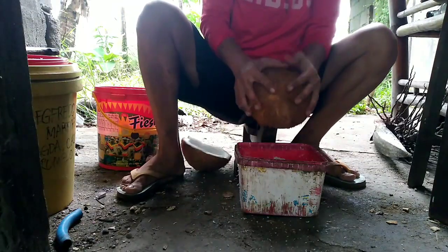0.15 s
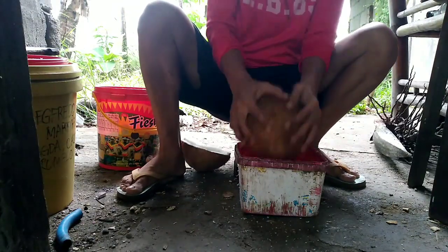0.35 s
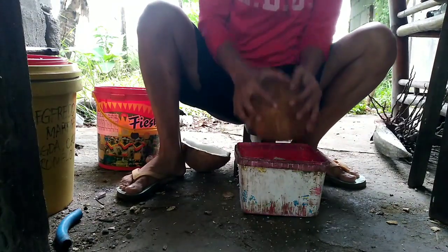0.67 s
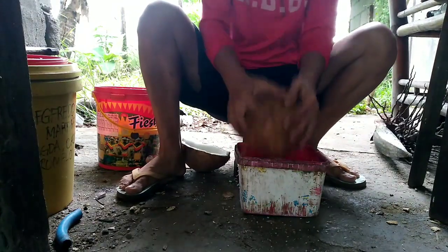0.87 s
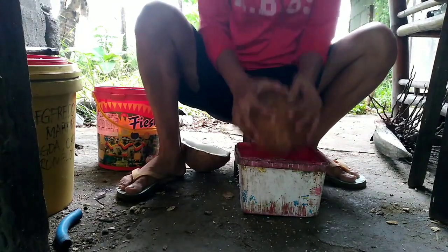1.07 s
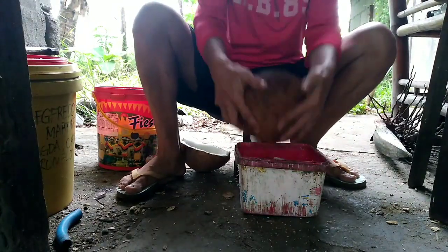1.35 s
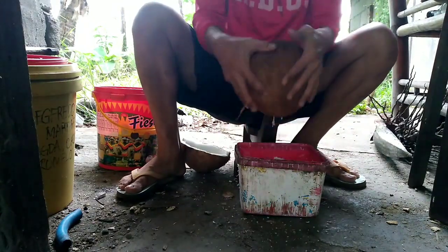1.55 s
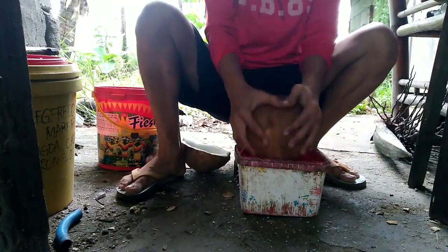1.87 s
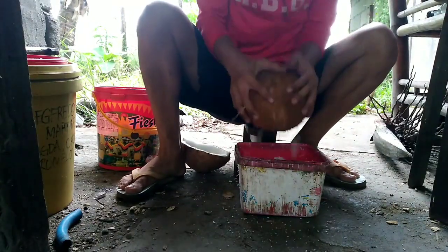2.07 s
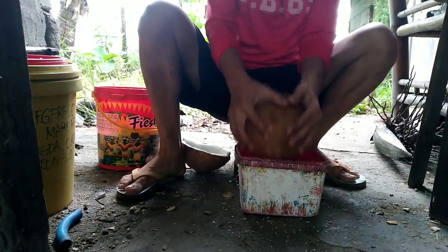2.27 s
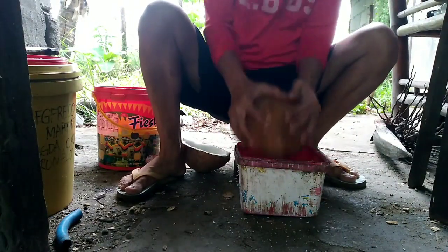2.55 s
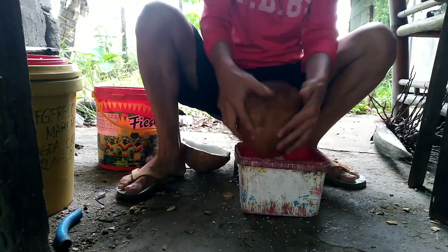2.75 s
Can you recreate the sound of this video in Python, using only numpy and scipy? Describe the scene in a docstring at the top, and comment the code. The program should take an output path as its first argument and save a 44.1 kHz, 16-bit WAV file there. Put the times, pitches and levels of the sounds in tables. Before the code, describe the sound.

Half a coconut is scraped on a toothed metal grater, six crunchy, hollow rasps with small knocks and squeaks between pauses; close stereo microphone under an open shelter, a faint engine humming far off.

```python
"""An engine hums far off under a faint hiss; after a barely audible touch, half a coconut is pulled six times
over the toothed metal blade of a grater, under a roof on a concrete floor. Each pull swells and dies away.
Engine: sine orders; air: coloured noise. Pulls: random fibre snaps and friction noise, juddering, coloured
as rasp and spray and ringing in hollow shell and blade. Set-downs are damped thumps with clink and scuff;
torn clumps are falling chirps, squeaks are short tones. Echoes and a short tail make the shelter."""
import sys
import numpy as np
from scipy import signal
from scipy.fft import rfft, irfft
from scipy.io import wavfile

SR = 44100
rng = np.random.default_rng(int(sys.argv[2]) if len(sys.argv) > 2 else 0)


def put_to_file(sound):
    """Save the sound as 16-bit audio at rate SR, in the file named by the first command-line argument."""
    columns = np.atleast_2d(sound).T  # one column per channel
    safe = np.clip(columns, -1, 1)
    whole_steps = np.round(safe * 32767)
    wavfile.write(sys.argv[1], SR, whole_steps.astype(np.int16))


N = 127890
T = np.arange(N) / SR


def from_db(db):
    """Amplitude ratio."""
    return 10 ** (np.asarray(db) / 20)


def rms_one(x):
    """Scales to rms 1."""
    return x / np.sqrt(np.mean(x ** 2) + 1e-20)


def at_hz(points, hz):
    """Interpolates a table over log frequency."""
    points = np.array(points)
    return np.interp(np.log(hz), np.log(points[:, 0]), points[:, 1])


def drift(rate_hz):
    """Slow chance with spread 1: noise through a two-pole low-pass at SR / 20."""
    r = np.exp(-40 * np.pi * rate_hz / SR)
    noise = rng.standard_normal(N // 20 + 4002)
    slow = signal.lfilter([1], [1, -2 * r, r * r], noise)[4000:]  # drop the settling
    return np.interp(np.arange(N) / 20, np.arange(len(slow)), rms_one(slow))


def blip(age, rise_s):
    """Short rounded burst, peak 1 at rise_s."""
    return (age / rise_s * np.exp(1 - age / rise_s)) ** 2


def widen(pair, alike):
    """Two unrelated signals become left and right with a given likeness."""
    alike = np.clip(alike, -1, 1)
    side = np.array([[1], [-1]])
    return np.sqrt(1 + alike) * pair[0] + np.sqrt(1 - alike) * pair[1] * side


PATCHES_PER_S = 35


def colour(draws, spectrum, likeness, patchy_db):
    """Third-octave bands, neighbours fed by different draws, flickering singly if patchy; stereo, rms 1."""
    out = 0
    edges_hz = 22 * 2 ** (np.arange(30) / 3)
    for k, (low, high) in enumerate(zip(edges_hz, edges_hz[1:])):
        hz = np.sqrt(low * high)
        if hz <= spectrum[0][0] / 2:
            continue
        sos = signal.butter(2, [low, high], "band", fs=SR, output="sos")
        band = signal.sosfilt(sos, draws[k % 2])
        flicker_db = patchy_db * drift(PATCHES_PER_S) if patchy_db else 0
        out = out + from_db(at_hz(spectrum, hz) + flicker_db) * widen(band, at_hz(likeness, hz))
    return rms_one(out)


def shape_noise(x, spectrum):
    """Finely drawn spectrum, falling away below its first point; rms 1."""
    hz = np.arange(N // 2 + 1) * SR / N + 1
    gain = from_db(at_hz(spectrum, hz)) * np.minimum(hz / spectrum[0][0], 1) ** 2
    return rms_one(irfft(rfft(x) * gain, N))


def resonate(x, modes):
    """Parallel two-pole resonances of alternating sign."""
    out = 0
    for k, (hz, width_hz, db) in enumerate(modes):
        r = np.exp(-np.pi * width_hz / SR)
        b = [(1 - r * r) / 2, 0, (r * r - 1) / 2]
        a = [1, -2 * r * np.cos(2 * np.pi * hz / SR), r * r]
        out = out + (-1) ** k * from_db(db) * signal.lfilter(b, a, x + 1e-18)
    return out


ENGINE_HZ = 33.37
ENGINE_WAVER_DB, ENGINE_WAVER_HZ = 2, 5
# engine orders: [multiple of turning rate, relative level/dB]
ENGINE_ORDERS = [(1, -22), (2, -0.5), (3, -9.5), (4, -18.5), (5, -11), (6, -14.5)]
# engine level over time: [t/s, relative level/dB]
ENGINE_LEVEL = [(0.0, -44.5), (0.24, -58), (0.41, -43.5), (0.76, -53), (1.08, -36), (1.17, -53),
                (1.33, -43.5), (1.65, -45), (1.75, -35.5), (2.0, -49.5), (2.19, -39), (2.33, -55),
                (2.49, -39), (2.9, -52.5)]


def engine():
    """Low orders of a far engine: sines on one unsteady turning rate, each wavering in level."""
    turns = np.cumsum(ENGINE_HZ * (1 + 0.0099 * drift(1.72))) / SR
    hum = 0
    for order, db in ENGINE_ORDERS:
        level = from_db(db + ENGINE_WAVER_DB * drift(ENGINE_WAVER_HZ))
        hum = hum + level * np.sin(2 * np.pi * (order * turns + rng.random()))
    return np.sqrt(2) * hum * from_db(np.interp(T, *np.transpose(ENGINE_LEVEL)))


AIR_DB, HISS_DB = -46.5, -61.5
# outdoor air: [f/Hz, relative level/dB per Hz]
AIR_SPECTRUM = [(25, -9), (50, -6), (80, -9.5), (125, -12), (190, -11), (290, -19.5), (400, -24.5),
                (620, -29.5), (1140, -39), (3400, -34), (7000, -49), (9000, -72)]
# outdoor air: [f/Hz, left-right likeness]
AIR_LIKENESS = [(60, 0.82), (290, 0.97), (640, 0.34), (1400, 0), (12000, 0.053)]
# faint hiss: [f/Hz, relative level/dB per Hz]
HISS_SPECTRUM = [(5000, -18), (7600, -13), (8900, -5), (9900, -4.5), (10900, -26), (15500, -36)]


def outdoor_air():
    """Steady noise: low air, much alike in both ears at the bottom, plus a treble hiss unrelated left and right."""
    air = colour(rng.standard_normal((2, 2, N)), AIR_SPECTRUM, AIR_LIKENESS, 0)
    hiss = shape_noise(rng.standard_normal((2, N)), HISS_SPECTRUM)
    return from_db(AIR_DB) * air + from_db(HISS_DB) * hiss


BITE_S, CREST_S = 0.017, 0.026  # teeth take hold; rounding of the crest


def pull(bite_s, crest_s, rise_db_per_s, fall_db_per_s):
    """Force of one stroke: the teeth bite, the pull swells to a rounded crest and dies away."""
    away_s = np.hypot(T - crest_s, CREST_S) - CREST_S
    slope = np.where(T < crest_s, rise_db_per_s, fall_db_per_s)
    return np.clip((T - bite_s) / BITE_S, 0, 1) * from_db(-away_s * slope)


TEARS_PER_S, TEAR_SPREAD_DB, SMOOTH_SHARE = 1800, 4, 0.3


def tears():
    """Fibres snap at random, with uneven sizes, over smooth friction; two draws of two signals."""
    happens = rng.random(N) < TEARS_PER_S / SR
    sizes = from_db(TEAR_SPREAD_DB * np.minimum(rng.exponential(1, N), 4)) * happens
    snaps = rms_one(sizes * rng.choice([-1, 1], (2, 2, N)))
    return snaps + SMOOTH_SHARE * rng.standard_normal((2, 2, N))


CRACKS_PER_S, CRACK_SPREAD_DB = 170, 6.5
# stiff fibres: [f/Hz, relative level/dB per Hz]
CRACK_SPECTRUM = [(900, -1.5), (2000, 1.5), (4200, -1.5), (6500, -15), (9000, -5), (11000, -22),
                  (15500, -24)]


def cracks():
    """Single stiff fibres snap: sparse, sharp, of uneven size; rms 1."""
    happens = rng.random(N) < CRACKS_PER_S / SR
    sizes = from_db(CRACK_SPREAD_DB * np.minimum(rng.exponential(1, N), 2.5)) * happens
    return shape_noise(widen(sizes * rng.choice([-1, 1], (2, N)), 0.71), CRACK_SPECTRUM)


JUDDER_HZ, JUDDER_DB, HOLLOW_JUDDER_DB = 138, 2.0, 3.5
# relative layer levels
RASP_DB, CRACKS_DB, SPRAY_DB, HOLLOW_DB, RING_DB, THUD_DB = -1.5, -13, -11, -1, -2.5, -37.5
RASP_PATCHY_DB = 0.5  # colour shifts as different teeth cut
SPRAY_RISE, SPRAY_FALL = 0.75, 1.01  # slopes relative to the pull's
HOLLOW_POWER, HOLLOW_LEAD_S = 1.065, 0.0042  # speaks most under the hardest pull, crests early
THUD_LAG_S = 0.023  # the seat gives after the hardest pull
CATCH_RISE_S = 0.002
HOLLOW_LIKENESS, RING_LIKENESS = 1, 0.52
# strokes: [bite t/s, hardest pull t/s, relative level/dB, rise/(dB/s), fall/(dB/s),
#           hollow ring/dB and fine spray/dB re stroke, thud relative level/dB]
STROKES = [(0.034, 0.073, -53.5, 120, 200, -13, 11, -12), (0.167, 0.33, -30, 149, 286, 2.5, -2.5, -2.5),
           (0.588, 0.716, -28.5, 232, 423, -2, -1.5, -1), (0.978, 1.075, -30, 273, 299, -3.5, 0, -2.5),
           (1.623, 1.762, -30, 193, 310, 3.5, 0, 1), (2.053, 2.167, -32, 142, 306, -5.5, -0.5, -5),
           (2.433, 2.557, -32, 163, 388, -4.5, 2, -13)]
# brief changes of force as teeth catch or slip: [t/s, change of force/dB]
CATCHES = [(0.278, 7), (0.31, 3), (0.325, -0.5), (0.685, -3), (.714, -3), (0.991, 8), (1.047, 7),
           (1.104, 2), (1.706, 9), (1.718, 4.5), (1.744, 6), (1.806, 7), (2.068, 3), (2.142, 0),
           (2.205, 5.5), (2.519, 5), (2.614, 7)]
# tearing flesh: [f/Hz, relative level/dB per Hz]
RASP_SPECTRUM = [(120, -2), (330, 4), (800, -4), (1100, -6), (1300, -2.5), (1600, -7.5), (2400, -3.5),
                 (3300, -5.5), (4600, -6), (6200, -21), (9000, -18.5), (15000, -46)]
# tearing flesh: [f/Hz, left-right likeness]
RASP_LIKENESS = [(100, 0.57), (400, 1), (650, 0.8), (900, 0.05), (1600, 0.62), (2500, 0.98), (4000, 0.17),
                 (12000, 0.2)]
# fine spray: [f/Hz, relative level/dB per Hz]
SPRAY_SPECTRUM = [(3000, -17), (5000, -5.5), (7700, -7), (8800, 0), (9600, -5.5), (10600, -22),
                  (12500, -20), (15500, -32)]
# air in the shell: [f/Hz, width/Hz, relative level/dB]
HOLLOW_MODES = [(315, 35, -9), (450, 80, -4), (503, 35, -3), (571, 36, 1), (630, 50, -4)]
# shell wall and blade: [f/Hz, width/Hz, relative level/dB]
RING_MODES = [(846, 40, -10), (1025, 70, -6), (1588, 32, 3), (1930, 36, -3), (2012, 45, -5), (2174, 40, -5),
              (2398, 36, -3), (2506, 45, -5), (2617, 45, -2), (2800, 80, -1), (3565, 110, -9),
              (4220, 50, -10)]
# grater's seat: [f/Hz, width/Hz, relative level/dB]
SEAT_MODES = [(56, 14, 1), (105, 21, -3), (162.7, 16.5, -2)]


def grating():
    """The juddering strokes drive the rasp, snaps, fine spray, the shell's rings and a thud in the grater's seat."""
    force = hollow = spray = thud = 0
    for bite, crest, db, rise, fall, hollow_db, spray_db, thud_db in STROKES:
        force = force + pull(bite, crest, rise, fall) * from_db(db)
        hollow_pull = pull(bite + BITE_S, crest - HOLLOW_LEAD_S, rise, fall)
        hollow = hollow + hollow_pull ** HOLLOW_POWER * from_db(db + hollow_db)
        spray_pull = pull(bite, crest, rise * SPRAY_RISE, fall * SPRAY_FALL)
        spray = spray + spray_pull * from_db(db + spray_db)
        thud = thud + pull(bite, crest + THUD_LAG_S, rise, fall) * from_db(thud_db)
    catch = from_db(sum(db * blip(np.maximum(T - s, 0), CATCH_RISE_S) for s, db in CATCHES))

    judder = rms_one(from_db(JUDDER_DB * drift(JUDDER_HZ)))
    crunch = tears() * judder
    lumps = tears()[0] * judder * from_db(HOLLOW_JUDDER_DB * drift(JUDDER_HZ))
    grains = crunch[0] + 2.9 * rng.standard_normal((2, N))

    rasp = colour(crunch, RASP_SPECTRUM, RASP_LIKENESS, RASP_PATCHY_DB)
    cutting = from_db(RASP_DB) * rasp + from_db(CRACKS_DB) * cracks()
    ring = rms_one(resonate(widen(tears()[0] * judder, RING_LIKENESS), RING_MODES))
    hollow_ring = rms_one(resonate(widen(lumps, HOLLOW_LIKENESS), HOLLOW_MODES))
    fine_spray = shape_noise(widen(grains, 0.1), SPRAY_SPECTRUM)
    seat = rms_one(resonate(widen(rng.standard_normal((2, N)), 0.9), SEAT_MODES))
    return (force * catch * cutting
            + force * from_db(RING_DB) * ring
            + hollow * catch * from_db(HOLLOW_DB) * hollow_ring
            + spray * from_db(SPRAY_DB) * fine_spray
            + thud * from_db(THUD_DB) * seat)


KNOCK_T60_S, KNOCK_ATTACK_S = 0.018, 0.0022
CONTACT_RISE_S = 0.0013  # cushioned by the flesh
# shell set on the blade: [t/s, thump relative level/dB, thump f/Hz, clink relative level/dB,
#                          scuff relative level/dB]
KNOCKS = [(0.141, -26, 185, -60, -57), (0.6038, -11.5, 272, -27, -37), (0.966, -19.5, 220, -37.5, -37.5),
          (2.038, -33, 244, -43, -42), (2.443, -29.5, 257, -52, -37.5)]
# blade clink: [f/Hz, width/Hz, relative level/dB]
CLINK_MODES = [(1900, 72, -3), (2320, 114, 2.5), (2950, 130, -3.5), (4670, 240, -23.5)]
# flesh scuff: [f/Hz, relative level/dB per Hz]
SCUFF_SPECTRUM = [(400, 13), (1200, -10), (3000, 5), (5000, -6), (7000, -12), (9000, -5), (11000, -20),
                  (15000, -32)]


def knocks():
    """A soft, quickly damped thump, with a clink from the blade and a scuff of flesh."""
    thumps = clinks = scuffs = 0
    for s, db, hz, clink_db, scuff_db in KNOCKS:
        age = np.maximum(T - s, 0)
        attack = 1 - np.exp(-(age / KNOCK_ATTACK_S) ** 2)
        decay = from_db(db - 60 * age / KNOCK_T60_S)
        thumps = thumps + 2 * decay * attack * np.sin(2 * np.pi * hz * age)
        clinks = clinks + from_db(clink_db) * blip(age, CONTACT_RISE_S)
        scuffs = scuffs + from_db(scuff_db) * blip(age, 2 * CONTACT_RISE_S)
    grit = widen(rng.standard_normal((2, N)), RING_LIKENESS)
    scuff_noise = shape_noise(widen(rng.standard_normal((2, N)), RING_LIKENESS), SCUFF_SPECTRUM)
    return thumps + 6 * resonate(clinks * grit, CLINK_MODES) + scuffs * scuff_noise


RIP_FROM_HZ, RIP_TO_HZ, RIP_GLIDE_S, RIP_RISE_S = 3820, 417, 0.001314, 0.0018
# a tooth rips through a wet clump: [t/s, level/dB]
RIPS = [(.3093, -23), (.327, -25), (.7155, -26), (1.050, -25), (1.7505, -25), (1.765, -26), (2.145, -30)]


def rips():
    """Short chirps that fall exponentially from the blade's pitch to the hollow's."""
    out = 0
    for s, db in RIPS:
        age = np.maximum(T - s, 0)
        glide_turns = (RIP_FROM_HZ - RIP_TO_HZ) * RIP_GLIDE_S * (1 - np.exp(-age / RIP_GLIDE_S))
        turns = RIP_TO_HZ * age + glide_turns
        out = out + from_db(db) * blip(age, RIP_RISE_S) * np.sin(2 * np.pi * turns)
    return out


SQUEAK_RISE_S = 0.0039
# flesh sticks, blade squeaks: [t/s, level/dB, f/Hz]
SQUEAKS = [(0.342, -25, 2774), (.357, -29, 2817), (0.39, -35, 2710), (.733, -26, 2780), (1.107, -28, 2796),
           (1.780, -29, 3270), (2.479, -34.5, 2364), (2.561, -31, 2750)]


def squeaks():
    """Stick and slip keeps one unsteady note of the blade going for a few milliseconds."""
    clock_s = np.cumsum(1 + 0.0232 * drift(245)) / SR
    out = 0
    for s, db, hz in SQUEAKS:
        burst = blip(np.maximum(T - s, 0), SQUEAK_RISE_S)
        out = out + from_db(db) * burst * np.sin(2 * np.pi * hz * clock_s)
    return out


NOTCH_HZ, NOTCH_Q, NOTCH_DEPTH = 1273, 6.6, 0.71  # depth: share of the band lost


def shell_colour(x):
    """The open shell swallows a narrow band of everything that sounds in it."""
    notched = signal.lfilter(*signal.iirnotch(NOTCH_HZ, NOTCH_Q, fs=SR), x)
    return (1 - NOTCH_DEPTH) * x + NOTCH_DEPTH * notched


def delayed(x, left_s, right_s):
    """Delays each ear by whole samples."""
    lags_s = [round(s * SR) / SR for s in (left_s, right_s)]
    return np.array([np.interp(T - s, T, side, left=0) for side, s in zip(x, lags_s)])


REFLECT_FROM_HZ = 2900  # small surfaces reflect only the treble
# floor, tub and posts: [left delay t/s, right delay t/s, level/dB]
ECHOES = [(.0031, 0.0048, -8), (.0057, 0.008, -18), (.0089, 0.012, -17.5), (0.0154, .0132, -27)]


def echoes(x):
    """Floor, tub and posts throw the treble back as separate delays."""
    high_pass = signal.butter(2, REFLECT_FROM_HZ, "high", fs=SR, output="sos")
    bright = signal.sosfilt(high_pass, x)
    return sum(from_db(db) * delayed(bright, left, right) for left, right, db in ECHOES)


ROOM_T60_S, ROOM_DB, ROOM_LOW_HZ, ROOM_CUT_HZ = 0.15, -5, 406, 3600


def room(x):
    """A short, dull and thin tail from floor and roof: decaying noise, different in each ear."""
    age = T[:SR // 2]
    tail = rng.standard_normal((2, len(age))) * from_db(-60 * age / ROOM_T60_S) * (age > 0.004)
    tail = tail / np.sqrt(np.sum(tail ** 2) / 2)  # mean energy per ear 1
    band_pass = signal.butter(1, [ROOM_LOW_HZ, ROOM_CUT_HZ], "band", fs=SR, output="sos")
    tail = signal.sosfilt(band_pass, tail)
    return from_db(ROOM_DB) * signal.fftconvolve(x, tail, axes=1)[:, :N]


RIGHT_LAG_SAMPLES = 2


def scene():
    """The coconut in its shelter, a little nearer the left ear, over engine, outdoor air and hiss."""
    shell = shell_colour(grating() + knocks() + rips() + squeaks())
    coconut = delayed(shell, 0, RIGHT_LAG_SAMPLES / SR)
    return engine() + outdoor_air() + coconut + echoes(coconut) + room(coconut)


CUTOFF_HZ = 15600


def record(dry):
    """Steep elliptic low-pass cuts the top."""
    return signal.sosfilt(signal.ellip(10, 0.1, 80, CUTOFF_HZ, fs=SR, output="sos"), dry)


dry = scene()
out = record(dry)
put_to_file(out)
```